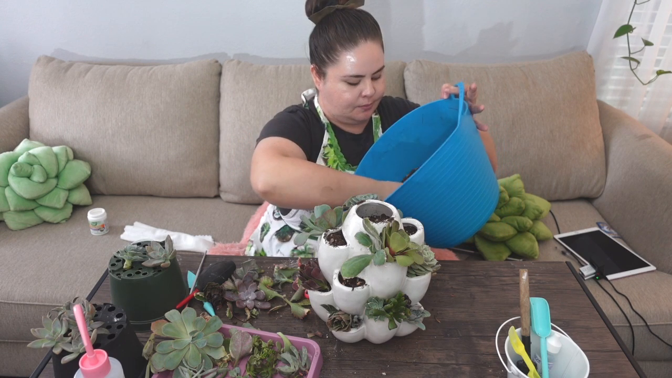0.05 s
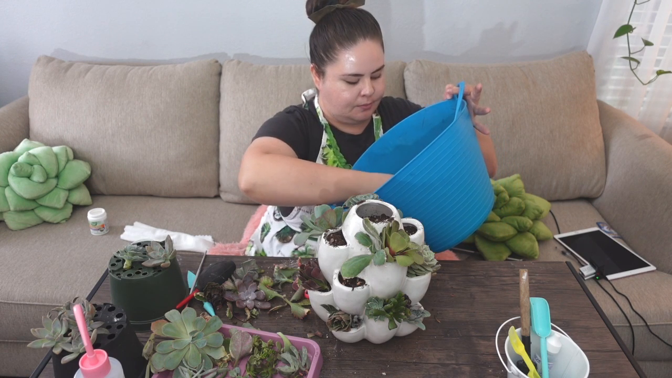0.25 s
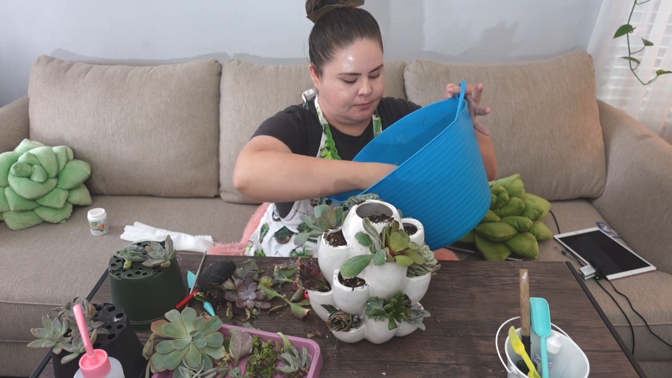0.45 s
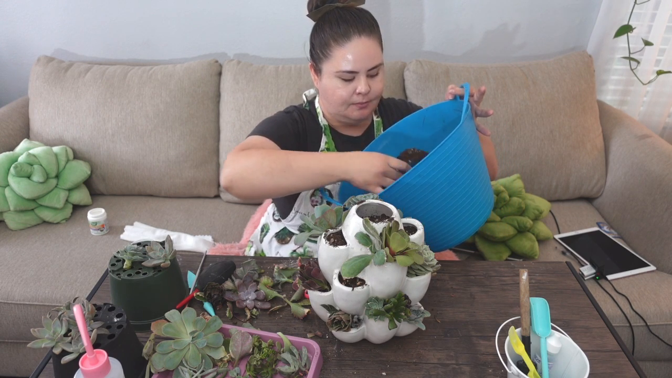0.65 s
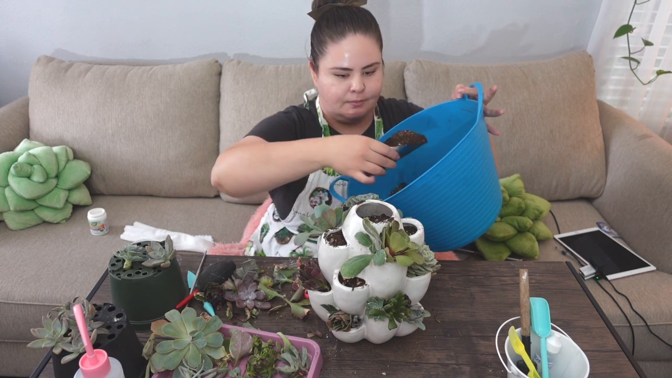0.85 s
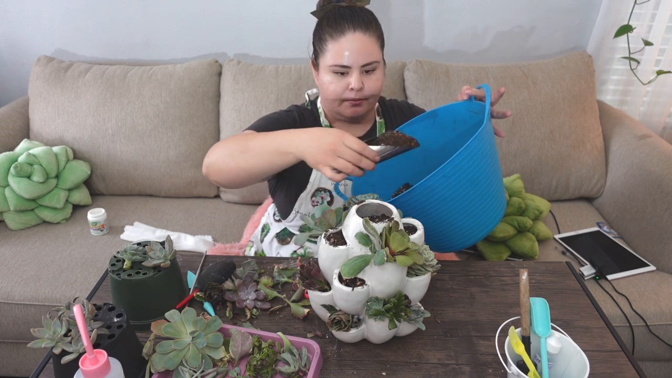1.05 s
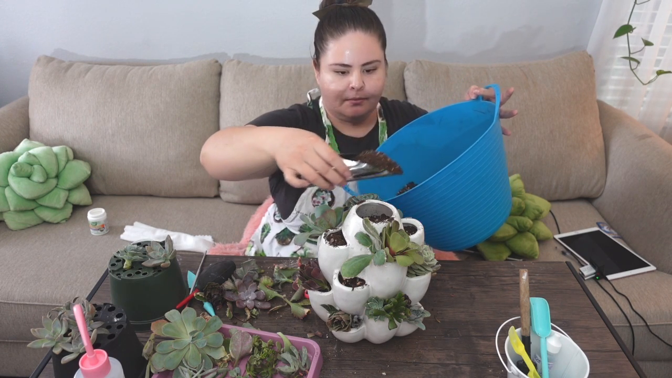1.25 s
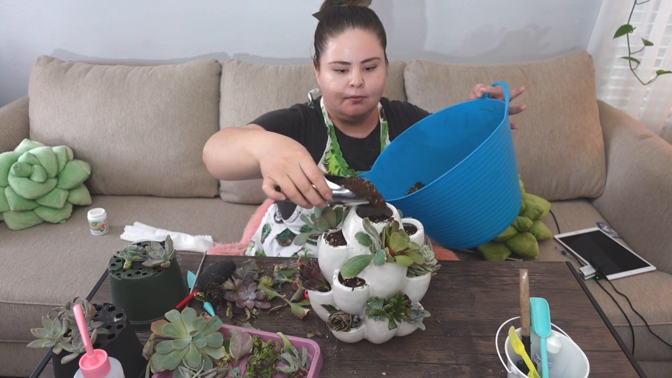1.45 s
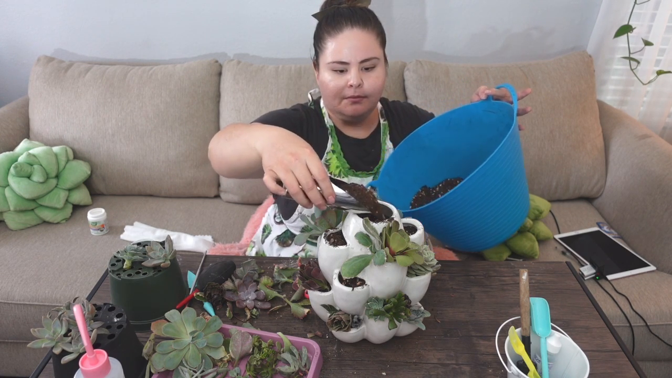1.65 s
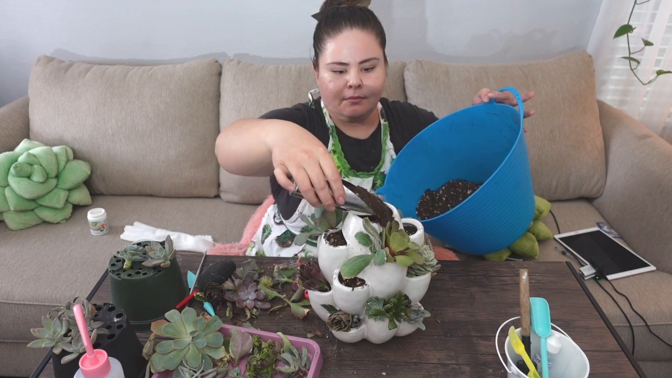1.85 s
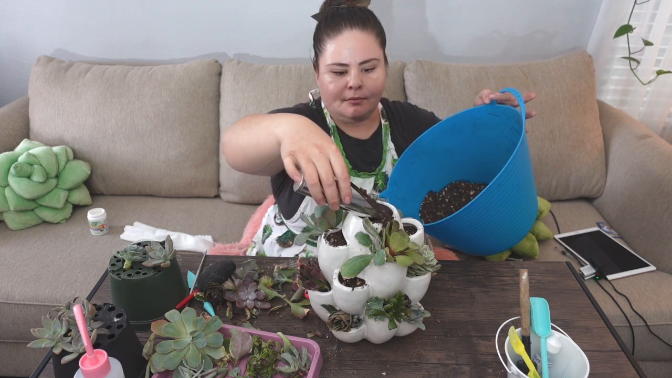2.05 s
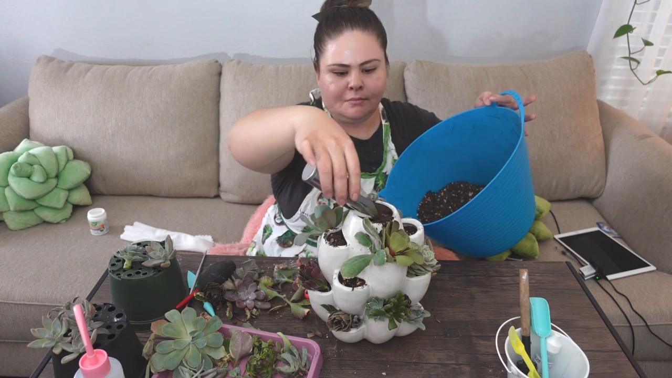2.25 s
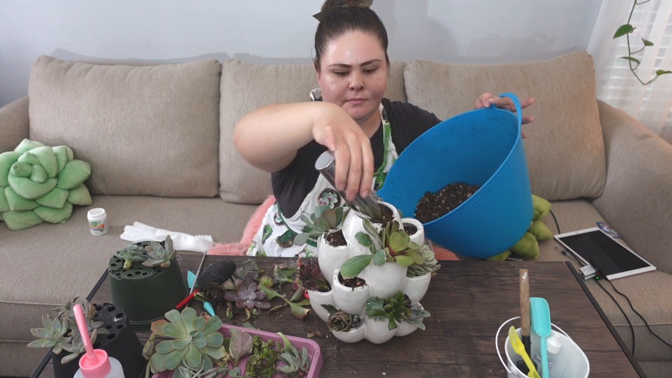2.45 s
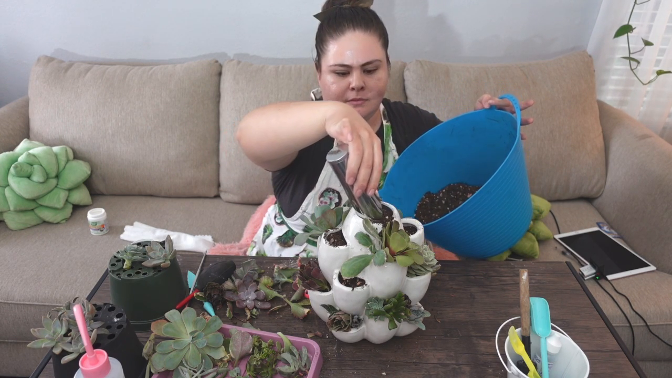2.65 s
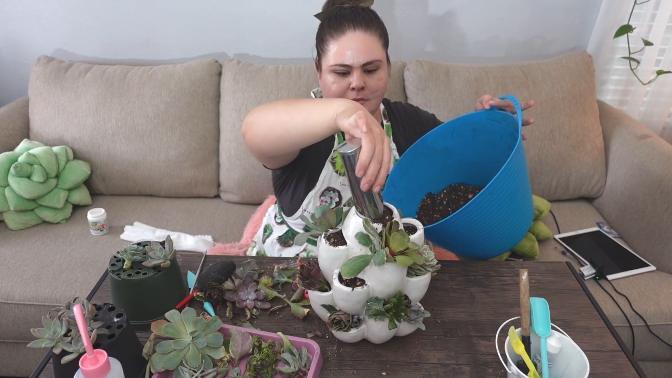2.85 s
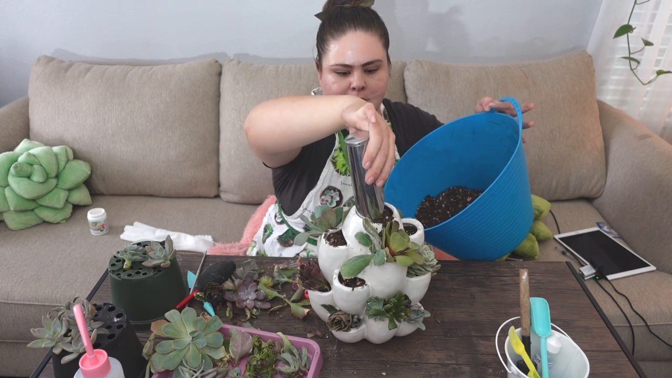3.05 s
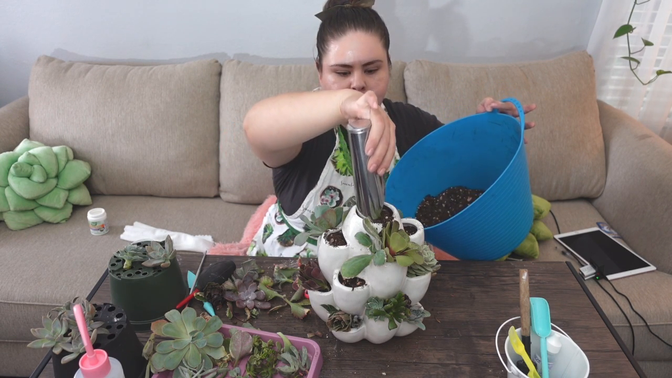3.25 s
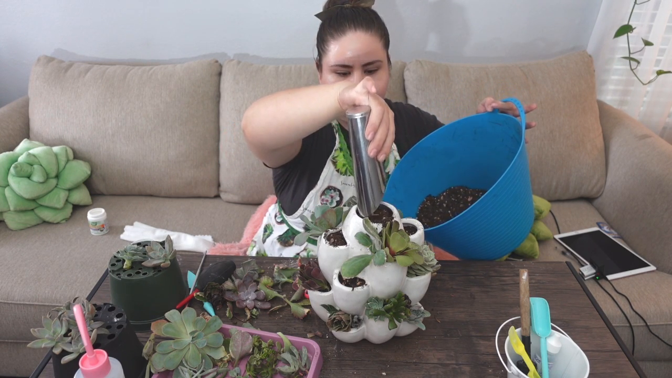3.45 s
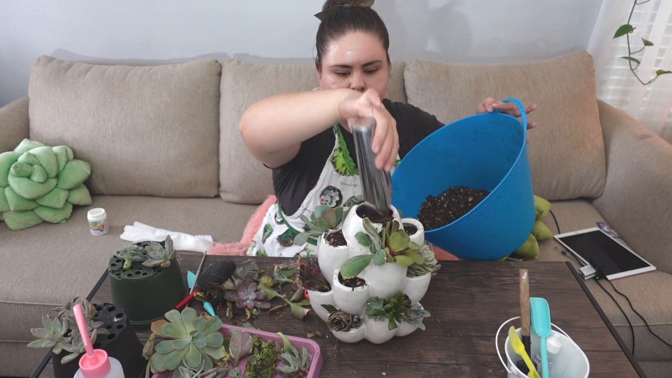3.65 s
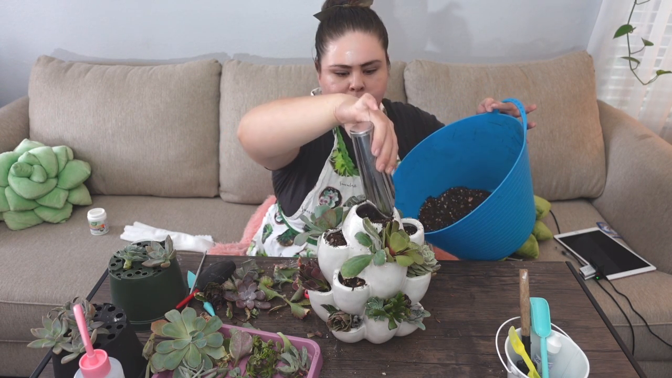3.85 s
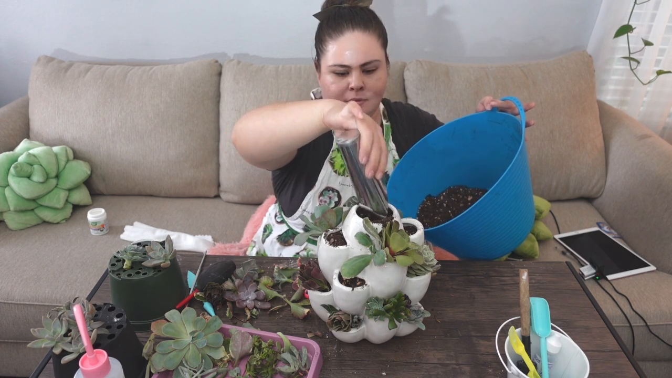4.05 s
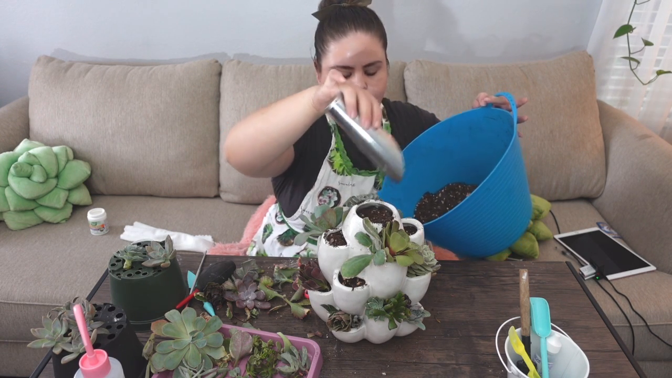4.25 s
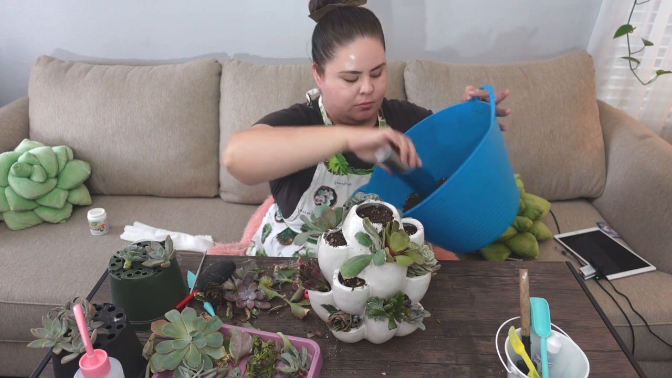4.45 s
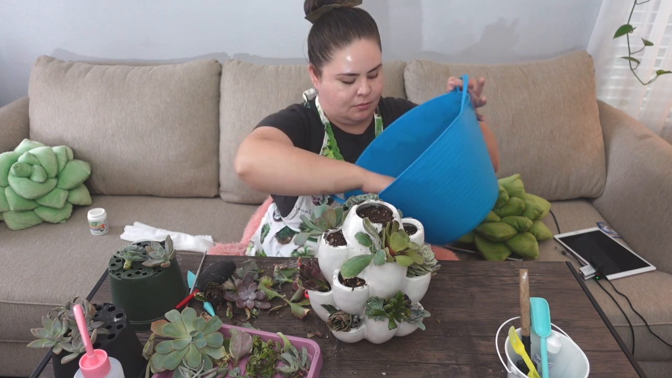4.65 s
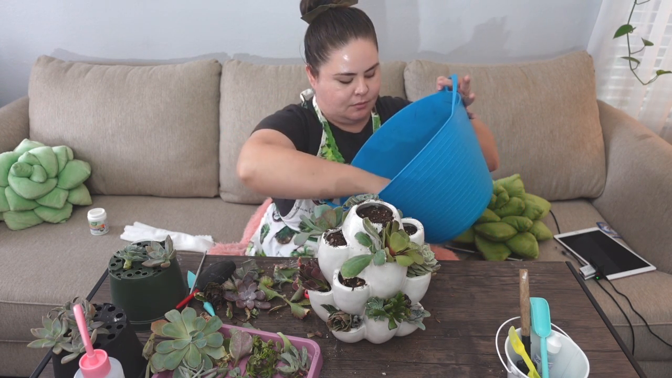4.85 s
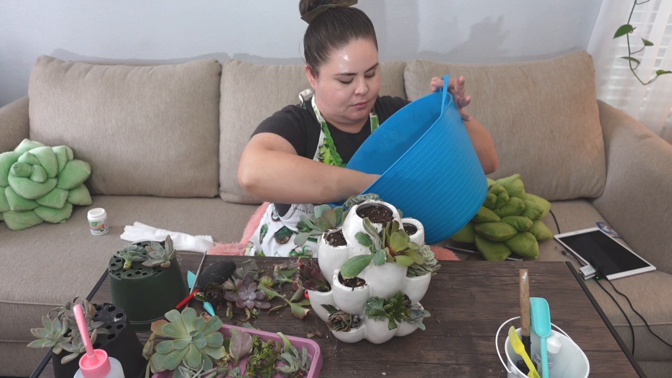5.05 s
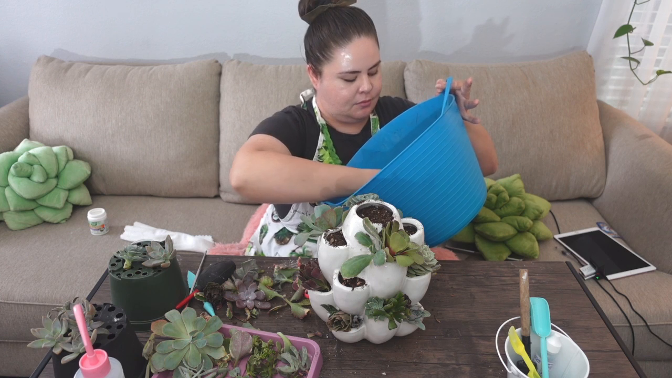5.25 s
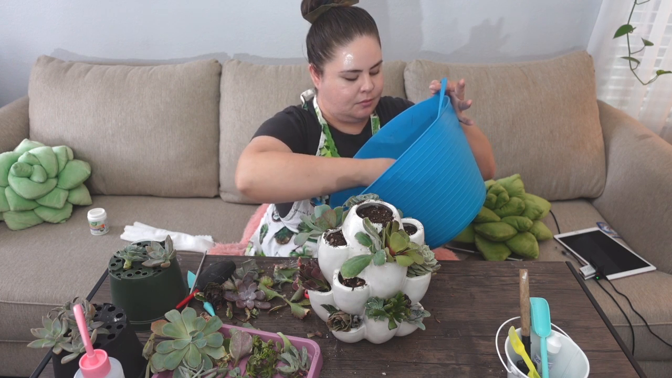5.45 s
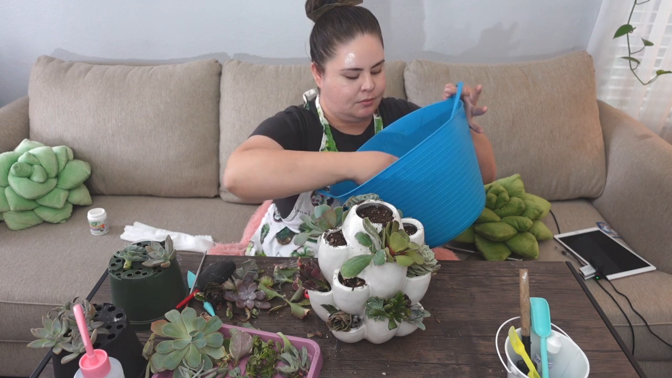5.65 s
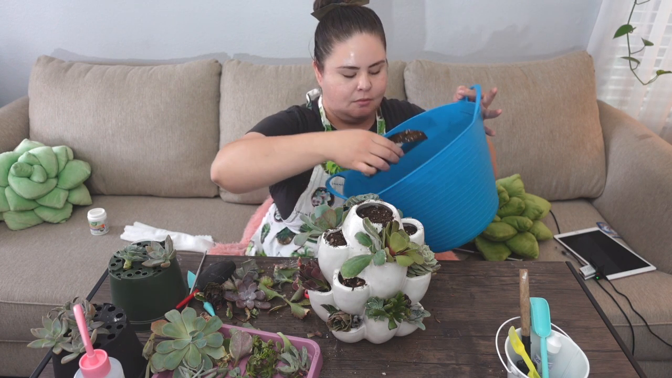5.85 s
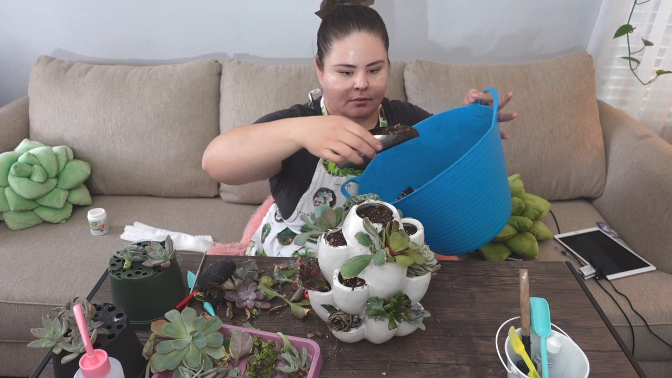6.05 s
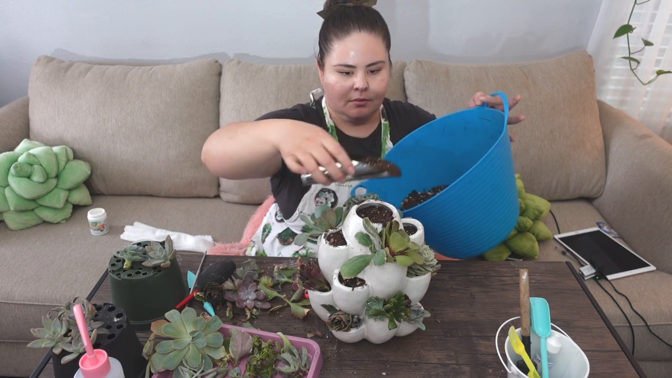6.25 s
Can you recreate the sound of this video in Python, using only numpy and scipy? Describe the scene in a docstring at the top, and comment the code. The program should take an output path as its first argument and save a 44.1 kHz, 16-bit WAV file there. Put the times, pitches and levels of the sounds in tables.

```python
"""A hollow crunch, as a metal scoop digs into potting soil in a flexible plastic tub at a living-room table.
The blade rings as it comes free and the tub creaks. The scoop knocks on a ceramic planter, lets the soil
slide in, is tapped clean on the rim and plunges back into the tub. Impacts and colliding grains excite
the resonances of tub, blade and planter; stick-slip friction groans. A fan-like hush fills the small room."""
import sys
import numpy as np
from scipy import signal
from scipy.fft import rfft, irfft, next_fast_len
from scipy.io import wavfile
from scipy.ndimage import uniform_filter1d

SR = 44100
rng = np.random.default_rng(int(sys.argv[2]) if len(sys.argv) > 2 else 0)


def inscribe(sig):
    """Save sig as 16-bit PCM at rate SR to the path in sys.argv[1].

    A 1-D sig is mono; a 2-D sig holds one channel per row.
    Samples are clipped to [-1, 1] before scaling.
    """
    pcm = np.round(np.clip(np.atleast_2d(sig).T, -1, 1) * 32767)
    wavfile.write(sys.argv[1], SR, pcm.astype(np.int16))


N = 277874


def from_db(db):
    """Amplitude ratio: tenfold for every 20 dB."""
    return 10 ** (np.asarray(db) / 20)


def rms_one(x):
    """Normalisation to unit mean power."""
    return x / np.sqrt(np.mean(x ** 2) + 1e-20)


def at_hz(points, hz):
    """Interpolation on a log-frequency axis."""
    known_hz, values = np.transpose(points)
    return np.interp(np.log(np.maximum(hz, 1)), np.log(known_hz), values)


def add(out, start_s, sound):
    """Superposition: a sound joins the mix at its start time."""
    start = max(0, round(start_s * SR))
    out[start:start + len(sound)] += sound[:N - start]


def wander(shape, size):
    """Low-passed noise of rms 1, changing over about size samples."""
    return rms_one(uniform_filter1d(uniform_filter1d(rng.standard_normal(shape), size=size), size=size))


def body(x, colour, modes=()):
    """Resonant filtering. Each colour row: frequency in Hz, gain in dB.
    Each row of modes, the peaks on that colour: centre in Hz, bandwidth in Hz, height in dB."""
    length = x.shape[-1]
    size = 2 * next_fast_len(length // 2 + SR // 20)
    hz = np.arange(size // 2 + 1) * SR / size
    power = 1 + sum(from_db(db) ** 2 / (1 + (2 * (hz - centre) / width) ** 2)
                    for centre, width, db in modes)
    cepstrum = irfft(np.log(from_db(at_hz(colour, hz)) * np.sqrt(power)))
    cepstrum[1:size // 2] *= 2   # minimum phase: nothing sounds before its cause
    cepstrum[size // 2 + 1:] = 0
    return irfft(rfft(x, size) * np.exp(rfft(cepstrum)))[..., :length]


def strike(rows, colour, modes, crunch):
    """Impact excitation: a click and a dying crunch, low-passed by the contact's softness, drive a body."""
    out, t = np.zeros(N), np.arange(SR // 4) / SR
    for start_s, db, crunch_s, bright_hz in rows:
        crumbs = rng.standard_normal(len(t)) * from_db(5.2 * rng.standard_normal(len(t)))
        force = crunch * crumbs * np.exp(-t / crunch_s) + (t == 0)
        softness = np.exp(-2 * np.pi * bright_hz / SR)
        sound = body(signal.lfilter([1 - softness], [1, -softness], force), colour, modes)
        loudest = np.sqrt(uniform_filter1d(sound ** 2, size=130, mode="constant").max())
        add(out, start_s, from_db(db) * sound / loudest)
    return out


def grains(per_s, spread_db, clump_db=2):
    """Shot noise: tiny random collisions of uneven size, swelling as clumps break up."""
    sizes = from_db(spread_db * np.minimum(rng.exponential(1, N), 4)) * rng.choice([-1, 1], N)
    clumps = from_db(clump_db * wander(N, size=200))
    return sizes * clumps * (rng.random(N) < per_s / SR)


def flow(start_s, length_s, attack_s, settle_s, settle_power=1.82):
    """Envelope of granular flow: soil gets going, runs while driven, then settles by a power law."""
    t = np.maximum(np.arange(N) / SR - start_s, 0)
    return (1 - np.exp(-t / attack_s)) / (1 + np.maximum(t - length_s, 0) / settle_s) ** settle_power


# Stabs into the soil. Each row: start in seconds, level in dB, crunch decay in seconds,
# brightness in Hz, hollow pitch in Hz.
SOIL_STABS = [(0.002, -34.5, 0.013, 1710, 1060), (0.028, -53, 0.096, 2160, 1090),
              (4.589, -27.5, 0.012, 6400, 1034), (4.622, -35.5, 0.026, 4950, 2270),
              (4.832, -42.5, 0.005, 3020, 705), (4.902, -40.5, 0.0061, 2220, 680)]
# The tub's response. Each row: frequency in Hz, gain in dB.
TUB_COLOUR = [(60, -64), (130, -23), (235, -16.5), (380, -6), (600, -5.5), (900, -1), (1800, -5),
              (4500, -9), (9000, -17.5), (15000, -54)]
# Its resonances. Each row: centre in Hz, bandwidth in Hz, height in dB.
TUB_PEAKS = [(330, 140, 2.4), (758, 92, 6)]
def plunging(hollow_width_hz=115, hollow_db=8.0):
    """Resonance depends on shape: the soft tub deforms, so each stab has its own hollow pitch."""
    return sum(strike([contact], TUB_COLOUR, TUB_PEAKS + [(hz, hollow_width_hz, hollow_db)], crunch=1.0)
               for *contact, hz in SOIL_STABS)


# Bumps on the tub. Each row: start in seconds, level in dB, crunch decay in seconds, brightness in Hz.
TUB_BUMPS = [(0.002, -48, 0.02, 400), (4.66, -39.5, 0.0042, 1200), (4.6685, -27, 0.0055, 800)]
# Their spectrum. Each row: frequency in Hz, gain in dB.
BUMP_COLOUR = [(50, -52), (120, -34), (200, -3), (320, 5.5), (500, 6), (720, 3.5), (1600, 1.5), (3000, -35)]
def thudding():
    """A soft impact carries little treble, so the tub answers with a dull thud."""
    return strike(TUB_BUMPS, BUMP_COLOUR, (), crunch=0.39)


# Pushes through the soil. Each row: start and length in seconds, level in dB,
# relative grit level in dB, settling time in seconds.
SCOOP_PUSHES = [(0, 0.0032, -42.5, -7.5, 0.06), (4.583, 0.048, -60.5, 5, 0.013),
                (4.657, 0.025, -51, 7.5, 0.062), (4.84, 0.061, -47.5, -3, 0.016),
                (4.897, 0.02, -42, -15, 0.094)]
# Lifts, with grit running off. Each row: start and length in seconds, level in dB.
SCOOP_LIFTS = [(0.262, 0.044, -61.5), (0.44, 0.044, -64.5), (5.336, 0.014, -50), (5.42, 0.063, -60)]
# Spectra of shearing soil and of dry grit. Each row: frequency in Hz, gain in dB.
SHEAR_COLOUR = [(60, -50), (170, -33.5), (290, -11), (450, -15), (750, -6.5), (1300, 0.5), (2200, -7.5),
                (4500, -16), (12000, -41)]
HISS_COLOUR = [(800, -35), (2500, -5), (8500, -6), (11000, -12), (15500, -20)]
def digging():
    """Granular shear: the tub gives pushed soil a hollow voice, dry grit a hiss; a lift only hisses."""
    hollow = rms_one(body(grains(per_s=4000, spread_db=0.6), SHEAR_COLOUR, TUB_PEAKS))
    grit = grains(per_s=1900, spread_db=1.2)
    hiss = rms_one(body(grit, HISS_COLOUR, damped_blade(width_hz=37, db=5.5)))
    out = np.zeros(N)
    for start_s, length_s, db, grit_db, settle_s in SCOOP_PUSHES:
        push = flow(start_s, length_s, attack_s=0.00067, settle_s=settle_s)
        out += from_db(db) * push * (hollow + from_db(grit_db) * hiss)
    for start_s, length_s, db in SCOOP_LIFTS:
        out += from_db(db) * flow(start_s, length_s, attack_s=0.015, settle_s=0.032) * hiss
    return out


# The hush's spectrum. Each row: frequency in Hz, gain in dB.
HUSH_COLOUR = [(60, -41), (105, -17), (150, -19.5), (240, -11), (480, -9.5), (760, -1.5), (1050, -2),
               (1400, 1), (1800, -7), (2300, -4.5), (3000, -7.5), (6000, -10.5), (15500, -15)]
# Its resonances. Each row: centre in Hz, bandwidth in Hz, height in dB.
HUSH_PEAKS = [(748, 113, 7.4), (1966, 178, 11.9), (2247, 74, 13.8)]
# Its stereo width. Each row: frequency in Hz, side relative to mid in dB.
HUSH_SPREAD = [(110, -5), (900, 1.5), (7000, -0.5), (15000, -12.5)]
def room_hush(db=-61.5):
    """Stationary noise, shaped by a few resonances, makes a fan-like hush."""
    return from_db(db) * rms_one(body(diffuse(N, HUSH_SPREAD), HUSH_COLOUR, HUSH_PEAKS))


# Rubs on tub or planter. Each row: start and length in seconds, level in dB, first and last pitch in Hz.
WALL_RUBS = [(0.012, 0.0464, -42.5, 1450, 1402), (3.693, 0.109, -54, 951, 965),
             (4.656, 0.033, -38, 783, 626), (4.684, 0.033, -46.5, 298, 319)]
def rubbing(edge_s=0.0029, wobble_rad=0.65, flutter_db=1):
    """Stick-slip friction against a wall: a short, rough groan that glides as the scoop moves on."""
    out, t = np.zeros(N), np.arange(SR // 4) / SR
    for start_s, length_s, db, first_hz, last_hz in WALL_RUBS:
        waver, wobble = wander((2, len(t)), size=150)
        phase = 2 * np.pi * np.cumsum(np.interp(t, [0, length_s], [first_hz, last_hz])) / SR
        pressure = (1 - np.exp(-t / edge_s)) * np.exp(-np.maximum(t - length_s, 0) / edge_s)
        tone = np.sin(phase + wobble_rad * wobble)
        add(out, start_s, from_db(db + flutter_db * waver) * pressure * tone)
    return out


# Clicks of grit and the blade's edge. Each row: start in seconds, level in dB, crunch decay in seconds.
GRIT_TICKS = [(0.1662, -46, 0.0054), (0.5195, -57.5, 0.011), (2.303, -55, 0.0061), (2.3105, -52.5, 0.0023),
              (2.4995, -60.5, 0.011), (2.886, -61, 0.0054), (2.9175, -56, 0.003), (3.1372, -53, 0.0088),
              (3.243, -50.5, 0.003), (3.2515, -52.5, 0.0025), (3.304, -51, 0.005), (3.3125, -54, 0.004),
              (3.330, -51.5, 0.002), (3.3375, -55, 0.0018), (3.832, -40.5, 0.0085), (3.8471, -37, 0.0017),
              (4.849, -46.5, 0.0055), (5.3322, -44.5, 0.0018)]
# The spectrum of grit, ticking or sliding. Each row: frequency in Hz, gain in dB.
GRIT_COLOUR = [(150, -55), (550, -23), (900, -7.5), (1400, -20.5), (2500, -12), (4500, -4.5), (7500, -6),
               (11000, -12), (15500, -23.5)]
# A tick's resonance. Each row: centre in Hz, bandwidth in Hz, height in dB.
TICK_PEAKS = [(824, 65, 5.6)]
def ticking(bright_hz=9000):
    """Brief, hard contacts are broadband: they click and excite the blade's damped modes."""
    contacts = [(*tick, bright_hz) for tick in GRIT_TICKS]
    return strike(contacts, GRIT_COLOUR, TICK_PEAKS + damped_blade(width_hz=36, db=4), crunch=0.17)


# The blade is struck or rubbed. Each row: start in seconds, level in dB, tilt in dB per octave, # swell and
# hold times in seconds.
BLADE_EXCITATIONS = [(0.274, -59, 5, 0.0056, 0.12), (0.293, -44, 15, 0.00089, 0.0014),
                     (0.423, -55, 0, 0.0016, 0.013), (3.161, -60.5, -29, 0.02, 0.073), (3.32, -53, 5, .01, .005),
                     (3.944, -46, 3, 0.0011, .004), (5.4551, -32.5, -1.5, 0.0026, 0.0032),
                     (5.503, -49, -3, 0.0044, 0.0094)]
# The blade's modes. Each row: frequency in Hz, relative level in dB, time to fall 60 dB in seconds.
BLADE_MODES = [(2662, -1.5, 0.099), (2794, -14, 0.12), (4840, 2, 0.09), (7515, -2, 0.054), (8526, -7, 0.09),
               (10800, -11.5, 0.13), (12590, -22, 0.08), (14535, -23, 0.097)]
def blade_ringing(flutter_db=0.5, wobble_rad=np.pi / 5):
    """Driven, then free vibration: modes hold while the blade is struck or rubbed, then decay, wavering as it
    moves."""
    out, t = np.zeros(N), np.arange(SR * 2 // 3) / SR
    hz, mode_db, t60 = np.transpose(BLADE_MODES)[:, :, None]
    for start_s, db, tilt_db, swell_s, hold_s in BLADE_EXCITATIONS:
        gains = from_db(mode_db + tilt_db * np.log2(hz / hz[0]))
        waver, wobble = wander((2, len(hz), len(t)), size=220)
        tones = np.sin(2 * np.pi * (hz * t + rng.random(hz.shape)) + wobble_rad * wobble)
        swell = 1 - np.exp(-t / swell_s)
        decay = np.exp(-np.log(1000) * np.maximum(t - hold_s, 0) / t60)
        rings = gains * from_db(flutter_db * waver) * tones * decay
        add(out, start_s, from_db(db) * swell * rings.sum(0) / np.sqrt(np.sum(gains ** 2)))
    return out


def damped_blade(width_hz, db):
    """Damping broadens resonances: the blade's modes while something presses on it."""
    return [(hz, width_hz, db) for hz, *_ in BLADE_MODES]


# Slips of the plastic wall. Each row: start in seconds, level in dB, crunch decay in seconds.
WALL_SLIPS = [(0.44, -55.5, 0.00037), (0.4655, -48.5, 0.00079), (0.892, -49.5, 0.0036),
              (0.9758, -49.5, 0.00076), (1.0145, -49.5, 0.0016), (1.13, -57.5, 0.0015),
              (5.2845, -46.5, 0.0028), (5.428, -51, 0.008)]
# The wall's response. Each row: frequency in Hz, gain in dB.
WALL_COLOUR = [(100, -51), (500, -27.5), (720, -1.5), (1000, 5.5), (2200, 2.5), (3000, -3.5), (5000, -2.5),
               (7000, -10), (10000, -28), (16000, -20)]
def creaking(bright_hz=7440):
    """Stick-slip in single steps: each slip is an impulse to the tub's plastic wall."""
    return strike([(*slip, bright_hz) for slip in WALL_SLIPS], WALL_COLOUR, (), crunch=0.18)


# The knock. Each row: start in seconds, level in dB, crunch decay in seconds, brightness in Hz.
PLANTER_KNOCKS = [(1.6332, -36.5, 0.0037, 7000)]
# Its spectrum. Each row: frequency in Hz, gain in dB.
KNOCK_COLOUR = [(80, -73), (220, -8.5), (380, -18.5), (850, -7.5), (1600, -7), (2900, -11.5), (6000, -16.5),
                (15000, -31)]
# Its resonances. Each row: centre in Hz, bandwidth in Hz, height in dB.
KNOCK_PEAKS = [(1620, 130, 9), (2096, 170, 18.3), (3740, 140, 9.7), (5480, 150, 6.2), (6340, 140, 11.5)]
def knocking():
    """Impulse response: the loaded scoop, set on the planter, excites short-lived resonances."""
    return strike(PLANTER_KNOCKS, KNOCK_COLOUR, KNOCK_PEAKS, crunch=0.21)


# Soil slides into the planter. Each row: start and length in seconds, level in dB.
SOIL_SLIDES = [(2.297, 0.048, -64), (2.456, 0.11, -72.5), (2.699, 0.18, -68), (2.869, 0.018, -57.5),
               (3.105, 0.27, -65.5), (3.669, 0.042, -49.5), (3.9, 0.038, -56.5)]
# The resonances it excites. Each row: centre in Hz, bandwidth in Hz, height in dB.
SLIDE_PEAKS = [(813, 160, 9.5), (2650, 36, 18.4), (4190, 75, 2.3), (4840, 60, 10), (5260, 120, 7.9),
               (6390, 130, 5.7), (11500, 230, 5.3)]
def pouring():
    """Granular flow: each tilt or shake of the scoop sends crumbs rattling down the blade."""
    envelope = sum(from_db(db) * flow(start_s, length_s, attack_s=0.012, settle_s=0.052)
                   for start_s, length_s, db in SOIL_SLIDES)
    return envelope * rms_one(body(grains(per_s=2200, spread_db=-1.0), GRIT_COLOUR, SLIDE_PEAKS))


# Skids on the glaze. Each row: start in seconds, level in dB.
GLAZE_SKIDS = [(3.3745, -47.5), (3.6545, -42.5)]
# Their spectrum. Each row: frequency in Hz, gain in dB.
GLAZE_COLOUR = [(100, -50), (500, -29), (2200, -12), (5000, -3), (6800, 0), (9300, 2.5), (15000, -19)]
# Their resonances. Each row: centre in Hz, bandwidth in Hz, height in dB.
GLAZE_PEAKS = [(2100, 160, 13), (6900, 160, 7.2)]
def skidding(crunch_s=0.0094, bright_hz=12000):
    """Sliding friction: the edge skids on the glaze in a bright burst of noise."""
    contacts = [(*skid, crunch_s, bright_hz) for skid in GLAZE_SKIDS]
    return strike(contacts, GLAZE_COLOUR, GLAZE_PEAKS, crunch=0.75)


# Taps on the rim. Each row: start in seconds, level in dB, crunch decay in seconds, brightness in Hz.
RIM_TAPS = [(3.6842, -33, 0.0073, 4570), (3.7764, -50, 0.01, 5030), (3.9445, -27.5, 0.0037, 12000),
            (3.8405, -50, 0.0023, 9000), (3.953, -38, 0.0098, 13200), (3.959, -39, 0.0052, 14000),
            (3.993, -40, 0.0048, 14000)]
# Their spectrum. Each row: frequency in Hz, gain in dB.
RIM_COLOUR = [(60, -55), (200, -14), (600, -6.5), (900, -3.5), (1400, -8), (3300, 3), (5000, 2), (7500, 5),
              (11000, 3), (15500, -9.5)]
# Their resonances. Each row: centre in Hz, bandwidth in Hz, height in dB.
RIM_PEAKS = [(913, 83, 18.7), (1474, 120, 15.3), (2107, 135, 18.9), (2710, 63, 15.7), (4620, 290, 11.8),
             (5260, 220, 11.4), (6400, 310, 5)]
def tapping():
    """Hard impacts excite high modes: the scoop clacks on the rim as it is tapped clean."""
    return strike(RIM_TAPS, RIM_COLOUR, RIM_PEAKS, crunch=0.64)


def diffuse(size, width):
    """A diffuse field: noise common to both channels, plus a filtered side part of opposite signs."""
    mid, side = rng.standard_normal((2, size))
    return mid + body(side, width) * np.array([[1], [-1]])


# The reverberation's width. Each row: frequency in Hz, side relative to mid in dB.
ROOM_SPREAD = [(380, -16.5), (850, -6.5), (4000, -6), (9000, -3), (15000, -10)]
# Its decay. Each row: frequency in Hz, time to fall 60 dB in seconds.
ROOM_DECAY = [(150, 0.27), (500, 0.52), (1200, 0.54), (4000, 0.45), (12000, 0.42)]
def room_tail(build_s):
    """Reverberation of unit energy: each octave decays exponentially at its own rate."""
    size = SR * 2 // 3
    t, tail = np.arange(size) / SR, 0
    edges_hz = np.geomspace(70, 18000, 9)
    for low, high in zip(edges_hz, edges_hz[1:]):
        octave = signal.butter(2, [low, high], "band", fs=SR, output="sos")
        band = signal.sosfilt(octave, diffuse(size, ROOM_SPREAD))
        tail = tail + band * np.exp(-np.log(1000) * t / at_hz(ROOM_DECAY, np.sqrt(low * high)))
    return rms_one(tail * (1 - np.exp(-t / build_s)) ** 2) / np.sqrt(size)


def place(x, wet_db, pan_db, echoes=()):
    """Convolution with a room response: direct sound, any early echoes and a tail unique to each spot."""
    response = from_db(wet_db) * room_tail(build_s=0.00037)
    response[:, 0] += 1
    for delay_s, gain in echoes:
        response[:, round(delay_s * SR)] += gain
    return signal.fftconvolve(x[None], response, axes=1)[:, :N] * from_db([[pan_db / 2], [-pan_db / 2]])


# Reflections inside the tub. Each row: delay in seconds, gain as a ratio.
TUB_REFLECTIONS = [(.0045, 0.85), (0.012, 0.15)]
def scene():
    """Superposition in the room: tub slightly right, planter near the middle, hush all around."""
    soil = plunging() + thudding() + digging()
    creaks, knock, taps = creaking(), knocking(), tapping()
    ticks, skids, hush = ticking(), skidding(), room_hush()
    return (place(soil, wet_db=-4.0, pan_db=-1.0)
            + place(creaks, wet_db=3.5, pan_db=-1.5, echoes=TUB_REFLECTIONS)
            + place(knock, wet_db=-1.0, pan_db=-0.5)
            + place(taps + rubbing(), wet_db=-6.0, pan_db=-0.5)
            + place(ticks + skids + pouring(), wet_db=-3.0, pan_db=-0.8)
            + place(blade_ringing(), wet_db=-8.5, pan_db=-2.5) + hush)


def record(dry):
    """Band limiting: the microphone sheds the deep bass, and the top is cut steeply."""
    bass_hz, top_hz = 70, 15900
    thin = signal.sosfilt(signal.butter(1, bass_hz, "high", fs=SR, output="sos"), dry)
    return signal.sosfilt(signal.ellip(10, .1, 70, top_hz, fs=SR, output="sos"), thin)


dry = scene()
out = record(dry)
inscribe(out)
```